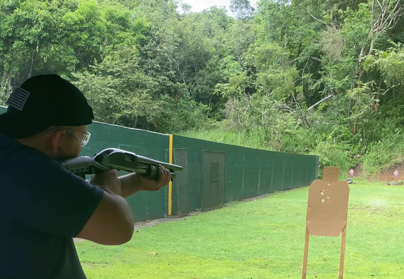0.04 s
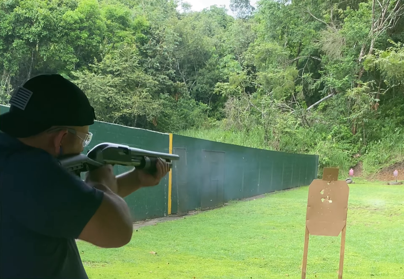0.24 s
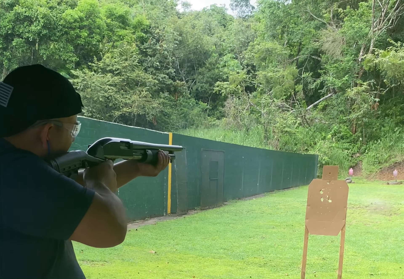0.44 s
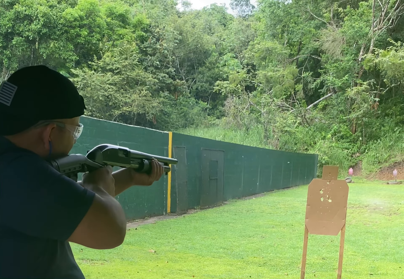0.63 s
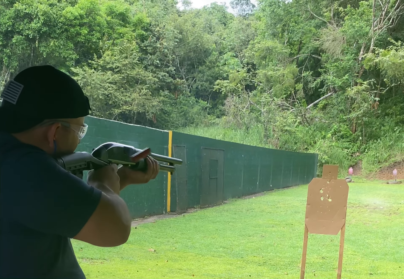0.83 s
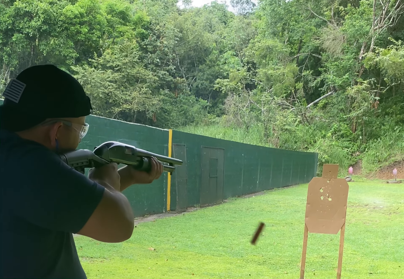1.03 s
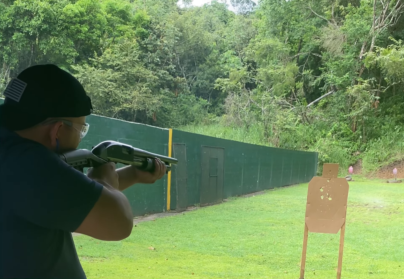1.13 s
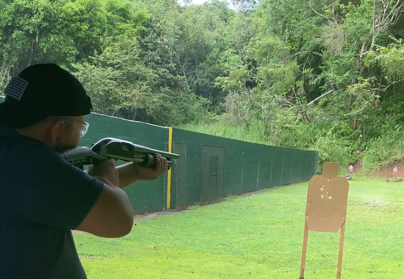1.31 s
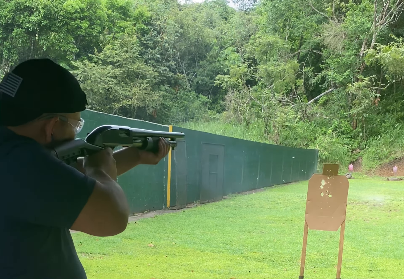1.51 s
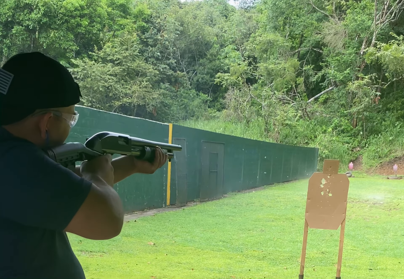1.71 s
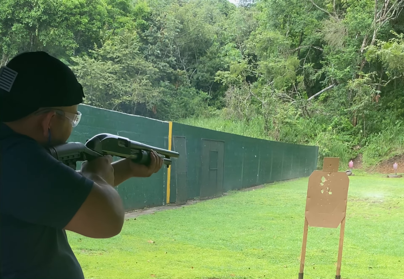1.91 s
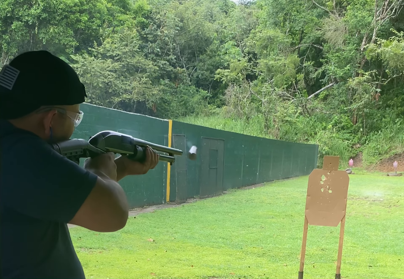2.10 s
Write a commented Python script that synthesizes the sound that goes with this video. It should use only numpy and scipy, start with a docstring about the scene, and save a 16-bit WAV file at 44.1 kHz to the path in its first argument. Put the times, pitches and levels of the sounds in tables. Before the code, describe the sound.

A pump shotgun fires, racks with a shell clink, and fires again, echoing off trees.

```python
"""A dying tail of an earlier shot, then a hammer click and a pump shotgun blast on an outdoor range.
The gun fires twice: a shock crack, a rush of noise, a low boom, slaps off a long wall and the ground.
Trees on the facing slope scatter each shot into a rolling tail with distinct echoes.
Between the shots the steel slide is racked and a brass shell clinks; the slide clacks again at the end.
Dull bumps and quiet air lie underneath. A fast limiter holds the blasts down."""
import sys
import numpy as np
from scipy import signal
from scipy.fft import rfft, irfft
from scipy.io import wavfile
from scipy.ndimage import uniform_filter1d, minimum_filter1d

SR = 44100
rng = np.random.default_rng(int(sys.argv[2]) if len(sys.argv) > 2 else 0)


def materialize(psi):
    """Save the field psi as 16-bit PCM at rate SR to the path in sys.argv[1].

    A 1-D psi becomes a single channel; in a 2-D psi each row is a channel.
    """
    bounded = np.clip(np.atleast_2d(psi).T, -1, 1)
    quanta = np.round(bounded * 32767).astype(np.int16)
    wavfile.write(sys.argv[1], SR, quanta)


N = 94815
T = np.arange(N) / SR
HZ = np.maximum(np.arange(N // 2 + 1) * SR / N, 1)
LOG_HZ = np.log(HZ)

# shots: t/s, blast gain/dB, tail gain/dB, front length/s
SHOTS = [(0.2497, 1.5, -0.5, 0.013), (1.431, -1.5, -2.5, 0.0174)]

# tree scatter spectrum: f/Hz, level/dB
TAIL_COLOUR = [(35, -106), (85, -87.5), (130, -80), (185, -79), (250, -103), (300, -101), (370, -85.5),
               (520, -107.5), (640, -69), (950, -70.5), (1600, -73.5), (2800, -74.5), (4400, -78),
               (5300, -81), (6600, -80), (9000, -85), (12000, -94), (13500, -113), (15500, -116)]
# tail decay: f/Hz, t60/s
TAIL_T60_S = [(80, 0.74), (350, 1.57), (750, 1.72), (2000, 1.256), (5000, 1.4), (12000, 0.42)]
# side-to-mid balance used for tails, slaps, echoes, air; top treble in opposite phase: f/Hz, ratio/dB
TAIL_SIDE_DB = [(60, -27), (170, -12), (380, -9), (700, -1), (2000, -0.5), (4000, 4.5), (7700, 4.5),
                (8900, 38.5), (12500, 42), (14500, 6.5)]
# slope colouring, one list per shot: f/Hz, width/Hz, gain/dB
TAIL_PEAKS = [
    [(450, 130, 9.5), (860, 80, 3), (1570, 80, -1.5), (2570, 150, 5), (3450, 120, -2), (5100, 90, -5)],
    [(289, 120, -9.5), (496, 130, -3.5), (876, 60, 4.5), (1750, 50, 1), (3100, 47, -1.5), (3450, 120, -2.5),
     (4080, 110, 6.5), (4930, 150, -9)],
]
# outdoor air spectrum: f/Hz, level/dB
AIR_COLOUR = [(30, -114), (110, -103), (270, -116), (500, -116), (750, -102), (2000, -106), (4500, -106),
              (6500, -111), (10000, -123), (15000, -140)]
# dull bumps: t/s, f/Hz, level/dB, half-length/s
BUMPS = [(0.12, 260, -88, 0.028), (0.123, 620, -85.5, 0.022), (0.205, 270, -80.5, 0.018),
         (0.2, 90, -79, 0.06), (0.286, 75, -56, 0.016), (0.385, 150, -74.5, 0.062), (0.705, 85, -71, 0.025),
         (0.842, 76, -84, 0.024), (0.928, 70.6, -90.5, .03), (1.082, 88, -86, 0.025),
         (1.1, 373, -96, 0.022), (1.204, 101, -94.5, 0.023)]

# hammer and slide-lock clicks: t/s, level/dB, build-up/s
CLICKS = [(.1928, 1, 0.0012), (1.3995, -9, 0.0019), (1.954, -12, 0.0016), (1.962, -11, 0.0014)]
# click spectrum: f/Hz, level/dB
CLICK_COLOUR = [(150, -86.5), (700, -79), (1300, -68.5), (2300, -79), (3800, -67.5), (4650, -52.5),
                (5400, -63.5), (6950, -59), (7800, -58.5), (11500, -62.5), (16000, -84)]
# steel receiver modes: f/Hz, level/dB, t60/s
RECEIVER_MODES = [(1340, -59.5, 0.13), (4660, -54.5, 0.042), (4500, -40.5, .09), (7170, -38, 0.06)]
# side-to-mid balance used for clicks and slide; left and right opposed near 9 kHz: f/Hz, ratio/dB
ACTION_SIDE_DB = [(100, 2.5), (700, -0.5), (4000, 1), (7400, 4.5), (9000, 36), (12000, 15.5), (14500, 1)]
# treble lost off the surroundings: f/Hz, gain/dB
ANSWER_LOSS = [(7500, -0.5), (9000, -8.5), (15000, -17.5)]

# shock front spectrum: f/Hz, level/dB
CRACK_COLOUR = [(200, -86.5), (1000, -55.5), (3000, -55), (8000, -52), (12000, -66), (15500, -85)]
# muzzle blast spectrum: f/Hz, level/dB
BLAST_COLOUR = [(30, -76), (100, -60.5), (240, -50.5), (430, -53.5), (600, -46), (800, -45), (1080, -55),
                (1330, -52.5), (2000, -50.5), (3100, -50.5), (5300, -54.5), (6800, -52.5), (9000, -52.5),
                (12000, -68), (15500, -77.5)]
# blast decay: f/Hz, t60/s
BLAST_T60_S = [(60, 0.056), (200, 0.14), (420, 0.073), (750, 0.36), (2000, 0.3), (5000, 0.32), (12000, 0.3)]
# side-to-mid balance used for blasts and cracks; left and right opposed at 8-14 kHz: f/Hz, ratio/dB
BLAST_SIDE_DB = [(60, -4.5), (160, -8), (280, -1.5), (600, 7.5), (1100, 1.5), (2000, 2), (4000, 1.5),
                 (7600, 4.5), (8800, 39), (13000, 64), (14500, -9.5)]
# peaks and notches from near reflections, one list per shot: f/Hz, width/Hz, gain/dB
BLAST_PEAKS = [
    [(427, 48, 2.5), (763, 50, 2), (830, 31, 2.5), (1220, 82, -6), (1278, 21, 12.5), (1440, 33, 9),
     (1610, 94, 3.5), (1730, 74, 9), (2303, 43, 2.5), (2530, 120, -2), (3064, 170, 8), (3640, 30, 5),
     (3810, 28, 6.5), (4770, 26, 5.5), (6200, 56, 10.5), (7560, 1700, -9)],
    [(630, 26, 9), (943, 56, 9.5), (1290, 27, 14.5), (1450, 52, -9), (1565, 52, 13), (1708, 48, 13),
     (1910, 86, 4), (2316, 43, 12.5), (3000, 94, -10), (3090, 17, 15), (3790, 27, 10.5), (4230, 86, 10),
     (4500, 36, 5), (5280, 90, -20), (5550, 60, 8.5), (5900, 32, 11.5), (6300, 26, 12), (7100, 50, -3)],
]
# low pressure swings: t/s, f/Hz, level/dB, swell/s
BOOMS = [(0.253, 243, -22, 0.0056), (.262, 62.5, -39.5, .012), (0.267, 165, -29, 0.0092),
         (1.4359, 316, -24, 0.0025), (1.4406, 116, -25, 0.0045)]

# wall and ground reflections: t/s, level/dB, t60/s
SLAPS = [(.278, 0, 0.049), (.2845, 2.5, 0.046), (.318, -2, 0.13), (.554, -17, 0.095), (.58, -18.5, 0.17),
         (1.4455, -1.5, .03), (1.461, -7, 0.19), (1.48, -5, 0.065), (1.5, -6, 0.12)]
# slap spectrum: f/Hz, level/dB
SLAP_COLOUR = [(200, -93.5), (500, -69), (780, -39), (1200, -51.5), (3000, -64), (8000, -69.5),
               (15000, -91)]
# shock returns off flat surfaces: t/s, peak/dB
PULSES = [(0.2783, -16), (0.2858, -24), (.4880, -30.5), (0.6138, -30.5), (1.4338, -12.5), (1.6704, -33)]
# distinct slope echoes: t/s, level/dB re tree scatter, t60/s
ECHOES = [(.433, 7, .05), (.464, 6, 0.029), (.4875, 10.5, 0.011), (.493, 3, 0.098), (.553, 3, 0.08),
          (.561, 4, .05), (.577, -1, 0.024), (.584, 2.5, 0.17), (.6125, 12.5, .014), (.618, -1.5, 0.076),
          (.644, -1.5, 0.034), (.694, -7, 0.13), (1.578, 2.5, .02), (1.615, 2.5, 0.14), (1.645, 5.5, 0.11),
          (1.669, 6, 0.034), (1.733, -1, 0.29), (1.764, 1, 0.13), (1.794, 3.5, 0.076), (1.826, -4, 0.056),
          (1.876, -16, 0.078)]
# echo spectrum re tree scatter: f/Hz, gain/dB
ECHO_TILT = [(50, -4), (170, 0.5), (400, -7), (900, 0), (3000, -1), (7000, -4)]

# slide contacts: t/s, level/dB, build-up/s
SLIDE_CONTACTS = [(.7965, -1.5, 0.0021), (.803, 1.5, 0.00064), (.812, 1.5, 0.0015), (1.002, -23, 0.0014),
                  (1.0372, -14, 0.0057), (1.116, -22, 0.054), (1.129, -16, 0.0044), (1.16, -10, 0.0041),
                  (1.3774, -24.5, 0.0017), (1.988, -2.5, 0.0043), (1.995, 3, 0.0037), (2.003, -8, .001)]
# slide spectrum: f/Hz, level/dB
SLIDE_COLOUR = [(150, -105), (480, -100), (700, -83.5), (1200, -83.5), (2000, -78.5), (3500, -73),
                (6500, -72.5), (9000, -71.5), (12000, -93), (15500, -88.5)]
# steel slide and bolt resonances: f/Hz, width/Hz, gain/dB
SLIDE_PEAKS = [(805, 85, 8.5), (2800, 94, 8), (3760, 93, 6.5), (3950, 40, 5), (3980, 60, 10),
               (4560, 200, -3), (5400, 60, 6), (6000, 140, 6.5), (6530, 110, 8.5)]
# shell flung out, next one lifted: t/s, level/dB, build-up/s
SHELL_TICKS = [(1.039, -8.5, 0.00037), (1.116, -8, .003), (1.127, -6, .001), (1.160, 0.5, 0.00091),
               (1.311, -16, .0005)]
# shell tick spectrum: f/Hz, level/dB
SHELL_COLOUR = [(700, -100), (2000, -82.5), (3500, -82), (7000, -91), (9500, -71.5), (12500, -92.5),
                (15500, -92)]
# side-to-mid balance used for ticks; left and right opposed near 10 kHz: f/Hz, ratio/dB
SHELL_SIDE_DB = [(700, 2), (7000, 3), (10000, 21), (15000, 0)]
# brass modes: f/Hz, level/dB, t60/s
BRASS_MODES = [(3490, -50.5, 0.072), (4100, -53, 0.085), (4150, -55, .05), (5400, -64, .06),
               (7960, -52, .04), (9453, -67, .04)]


def from_db(db):
    """Decibels to gain."""
    return np.exp(np.asarray(db) * (np.log(10) / 20))


def at_hz(points):
    """Table interpolated over log frequency."""
    hz, value = np.transpose(points)
    return np.interp(LOG_HZ, np.log(hz), value)


def resonances(peaks):
    """Lorentzian peaks and notches, in dB."""
    return sum(db / (1 + (2 * (HZ - hz) / width_hz) ** 2) for hz, width_hz, db in peaks)


def drift(rate_hz):
    """Random wander, spread near 1."""
    return np.interp(T * rate_hz, np.arange(N // 10), rng.standard_normal(N // 10))


def decay(start_s, t60_s):
    """Sudden start, exponential fall."""
    out = np.zeros(N)
    span = slice(*np.searchsorted(T, [start_s, start_s + 2 * t60_s]))
    out[span] = from_db(-60 * (T[span] - start_s) / t60_s)
    return out


def hits(rows, t60_s):
    """Power sum of equally fast decays."""
    return np.sqrt(sum((from_db(db) * decay(start_s, t60_s)) ** 2 for start_s, db, *_ in rows))


def smear(envelope):
    """Edges softened over 1.5 ms."""
    return uniform_filter1d(envelope, 64)


def scatter(colour, side_db, rough=0, lift_db=0, envelope=1):
    """Coloured stereo noise; rough makes its grains uneven."""
    white = rng.standard_normal((2, N)) * np.exp(rough * drift(1500))
    gain = from_db(at_hz(colour) + lift_db) * np.sqrt(SR / 2)
    mid, side = rfft(envelope * white / white.std()) * gain
    side_gain = from_db(at_hz(side_db))
    left_right = np.array([mid + side_gain * side, mid - side_gain * side])
    return irfft(left_right / np.sqrt(1 + side_gain ** 2), N)


def fade_bands(sound, hold_until_s, band_t60s):
    """Overlapping bands hold, then each dies at its own rate."""
    spectrum, out = rfft(sound), 0
    for centre_hz, t60_s in band_t60s:
        share = at_hz([(hz, float(hz == centre_hz)) for hz, _ in band_t60s])
        envelope = (T < hold_until_s) + decay(hold_until_s, t60_s)
        out = out + irfft(spectrum * share, N) * envelope
    return out


def tail(start_s, db, lift_db=0, rise_s=0.074, hold_s=0.29, flutter_db=1.5):
    """Trees return one shot: swell, level roll, long fade."""
    swell = from_db(db - flutter_db * drift(70)) * np.clip((T - start_s) / rise_s, 0, 1)
    roll = scatter(TAIL_COLOUR, TAIL_SIDE_DB, rough=0.033, lift_db=lift_db, envelope=swell)
    return fade_bands(roll, start_s + hold_s, TAIL_T60_S)


def tails():
    """Tree scatter of the earlier shot and of both blasts."""
    out = tail(start_s=-0.74, db=0)
    for (start_s, _, db, _), peaks in zip(SHOTS, TAIL_PEAKS):
        out += tail(start_s, db, resonances(peaks))
    return out


def air():
    """Quiet, steady outdoor hiss."""
    return scatter(AIR_COLOUR, TAIL_SIDE_DB)


def bumps(width_octaves=0.75):
    """Short, soft swells of low noise, each around its own pitch."""
    white, out = rfft(rng.standard_normal(N)) * np.sqrt(SR / 2), 0
    for centre_s, hz, db, half_s in BUMPS:
        octaves = np.log2(HZ / hz)
        band = 1 / (1 + (octaves / width_octaves) ** 2) ** 2
        swell = np.exp(-np.minimum(((T - centre_s) / half_s) ** 2, 20))
        out = out + from_db(db) * swell * irfft(white * band, N)
    return out


def knocks(rows, t60_s):
    """Hard-contact envelope: scraping build-up, short crack."""
    build_up = sum(from_db(db) * (T < hit_s) * np.exp(np.clip((T - hit_s) / build_s, -20, 0))
                   for hit_s, db, build_s in rows)
    return np.hypot(build_up, hits(rows, t60_s))


def answer(rows, colour, side_db, db, t60_s, lift_db=0):
    """The surroundings return each contact, weaker and duller."""
    duller = scatter(colour, side_db, lift_db=lift_db + at_hz(ANSWER_LOSS))
    return from_db(db) * hits(rows, t60_s) * duller


def ringing(rows, modes):
    """Struck metal: every contact rings every mode."""
    return sum(from_db(db) * hits(rows, t60_s) * np.sin(2 * np.pi * (hz * T + rng.random((2, 1))))
               for hz, db, t60_s in modes)


def hammer():
    """Hammer and slide lock click; the steel receiver rings."""
    click = knocks(CLICKS, t60_s=0.0041) * scatter(CLICK_COLOUR, ACTION_SIDE_DB, rough=0.1)
    returned = answer(CLICKS, CLICK_COLOUR, ACTION_SIDE_DB, db=-16, t60_s=0.35)
    return click + returned + ringing(CLICKS, RECEIVER_MODES)


def cracks():
    """Bright snap of each shock front."""
    return hits(SHOTS, t60_s=0.064) * scatter(CRACK_COLOUR, BLAST_SIDE_DB, rough=0.091)


def blasts(rise_db_per_s=1996.5, foot_db=-5, front_db=2, hold_s=0.0011, flutter_db=2.5):
    """Muzzle blasts coloured by near reflections: steep rise, raised front, fluttering decay."""
    out = 0
    for (start_s, db, _, front_s), peaks in zip(SHOTS, BLAST_PEAKS):
        age_s = T - start_s
        rush = scatter(BLAST_COLOUR, BLAST_SIDE_DB, rough=0.3, lift_db=resonances(peaks))
        step_db = smear(np.select([age_s < 0, age_s < front_s], [foot_db, front_db], 0.0))
        rise = from_db(db + step_db + rise_db_per_s * np.clip(age_s, -0.5, 0))
        flutter = from_db(flutter_db * drift(300) * (age_s > front_s))
        out = out + rise * flutter * fade_bands(rush, start_s + hold_s, BLAST_T60_S)
    return out


def booms():
    """Low pressure swings of the blasts: a few cycles swell and die."""
    out = np.zeros(N)
    for start_s, hz, db, swell_s in BOOMS:
        span = slice(*np.searchsorted(T, [start_s, start_s + 20 * swell_s]))
        age_s = T[span] - start_s
        swell = age_s / swell_s * np.exp(1 - age_s / swell_s)
        out[span] += from_db(db) * swell * np.sin(2 * np.pi * hz * age_s)
    return out


def reflections(rows):
    """Joint envelope of echoes, onsets smeared by rough surfaces."""
    power = sum((from_db(db) * decay(start_s, t60_s)) ** 2 for start_s, db, t60_s in rows)
    return smear(np.sqrt(power))


def slaps():
    """Wall and ground throw the blasts back."""
    return scatter(SLAP_COLOUR, TAIL_SIDE_DB, rough=0.26, envelope=reflections(SLAPS))


def pulses(band_hz=(800, 3500)):
    """Flat surfaces return the shock as one sharp pulse."""
    band = signal.butter(2, band_hz, "band", fs=SR, output="sos")
    snap = signal.sosfilt(band, signal.unit_impulse(SR // 100))
    train = np.zeros(N)
    for start_s, db in PULSES:
        train[int(start_s * SR)] = from_db(db)
    return np.convolve(train, snap / np.abs(snap).max())[:N]


def echoes():
    """Distinct returns from the slope stand out of the tails."""
    envelope = reflections(ECHOES)
    return scatter(TAIL_COLOUR, TAIL_SIDE_DB, rough=0.27, lift_db=at_hz(ECHO_TILT), envelope=envelope)


def slide():
    """The fore-end clatters back and the action closes, steel on steel."""
    steel_db = resonances(SLIDE_PEAKS)
    clatter = scatter(SLIDE_COLOUR, ACTION_SIDE_DB, rough=0.63, lift_db=steel_db)
    returned = answer(SLIDE_CONTACTS, SLIDE_COLOUR, ACTION_SIDE_DB, db=-7, t60_s=0.24, lift_db=steel_db)
    return knocks(SLIDE_CONTACTS, t60_s=0.03) * clatter + returned


def shells():
    """Shells tick through the action; their brass clinks."""
    tick = knocks(SHELL_TICKS, t60_s=0.0067) * scatter(SHELL_COLOUR, SHELL_SIDE_DB, rough=0.33)
    returned = answer(SHELL_TICKS, SHELL_COLOUR, SHELL_SIDE_DB, db=-4.5, t60_s=0.21)
    return tick + returned + ringing(SHELL_TICKS, BRASS_MODES)


def scene():
    """The gun and its echoes over quiet air."""
    background = tails() + air() + bumps()
    firing = hammer() + cracks() + blasts() + booms()
    returns = slaps() + pulses() + echoes()
    return background + firing + returns + slide() + shells()


def record(dry, ceiling=0.9, limiter_s=0.0008, stopband_hz=17000):
    """Fast peak limiter, then a steep low-pass."""
    window = int(limiter_s * SR)
    allowed_gain = ceiling / np.maximum(np.abs(dry).max(axis=0), ceiling)
    gain = uniform_filter1d(minimum_filter1d(allowed_gain, window), window)
    low_pass = signal.cheby2(14, 70, stopband_hz, fs=SR, output="sos")
    return signal.sosfilt(low_pass, dry * gain)


dry = scene()
out = record(dry)
materialize(out)
```